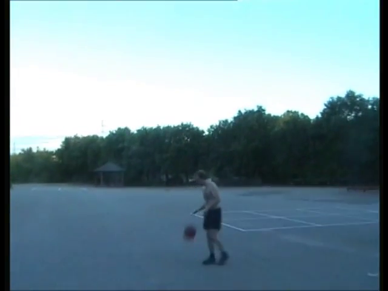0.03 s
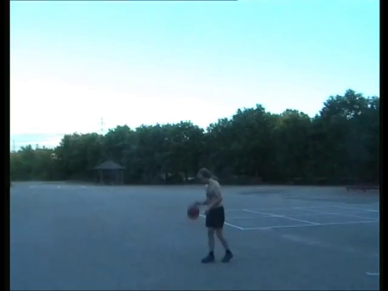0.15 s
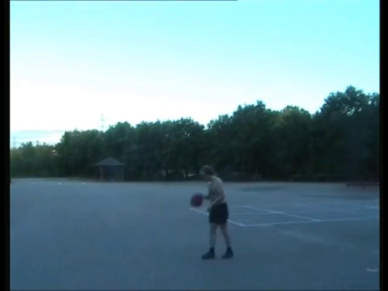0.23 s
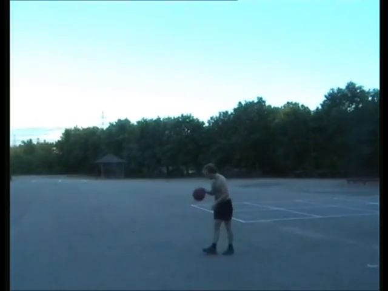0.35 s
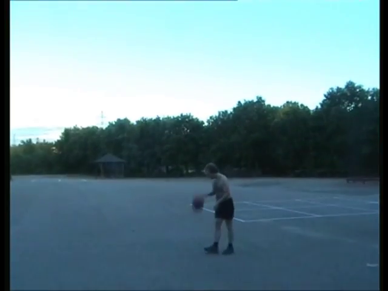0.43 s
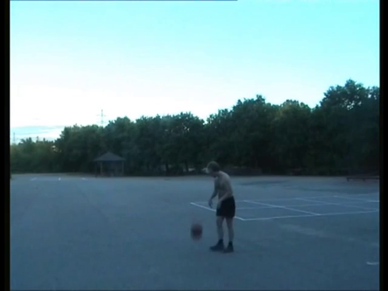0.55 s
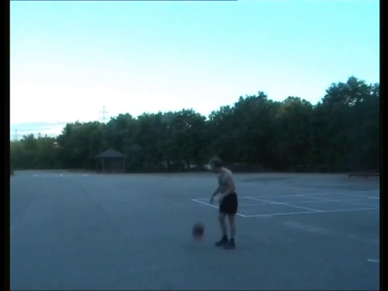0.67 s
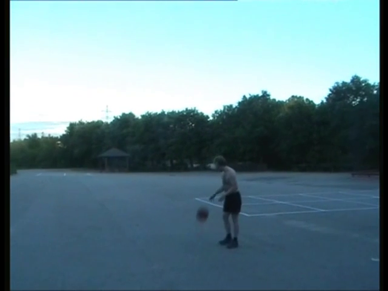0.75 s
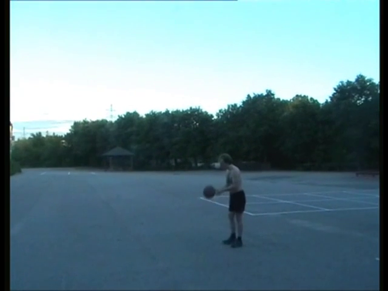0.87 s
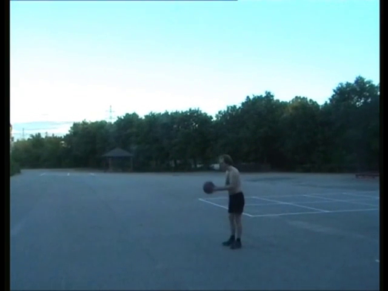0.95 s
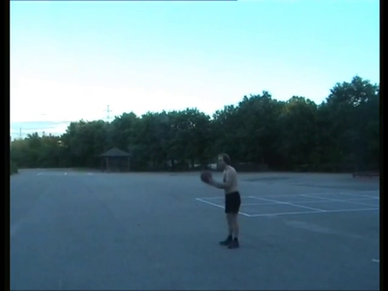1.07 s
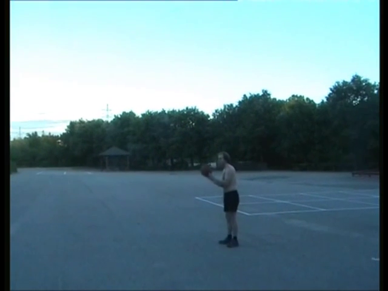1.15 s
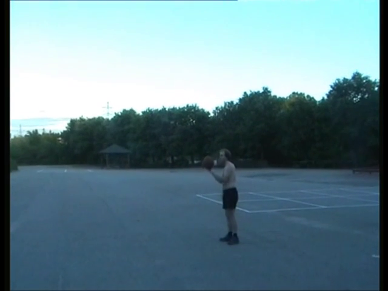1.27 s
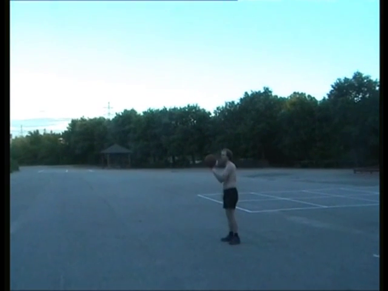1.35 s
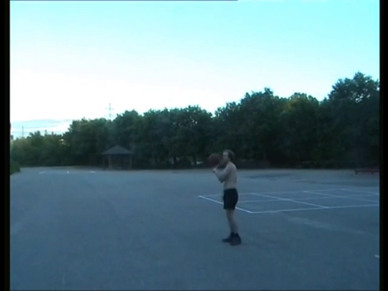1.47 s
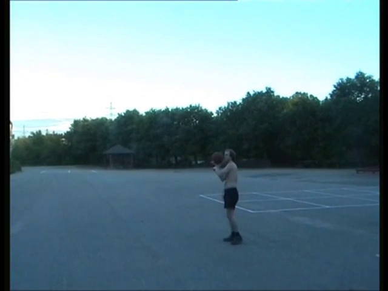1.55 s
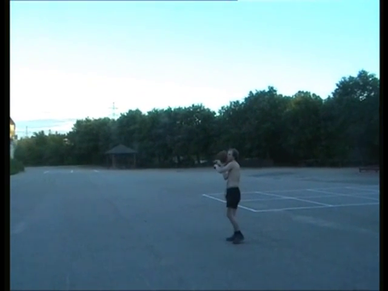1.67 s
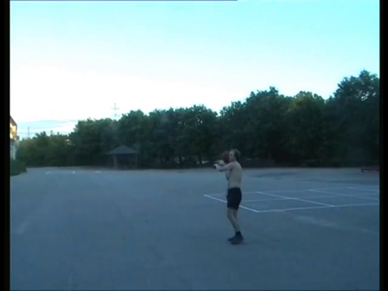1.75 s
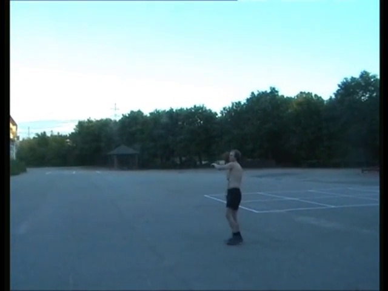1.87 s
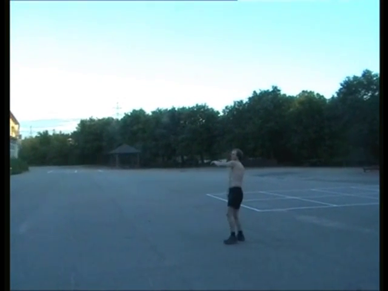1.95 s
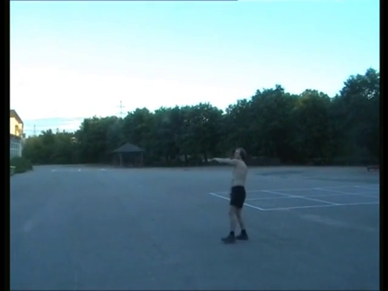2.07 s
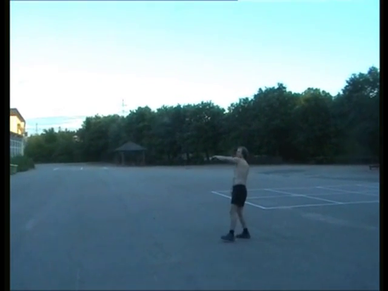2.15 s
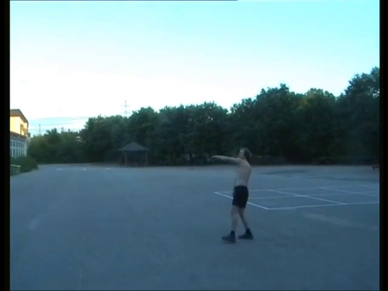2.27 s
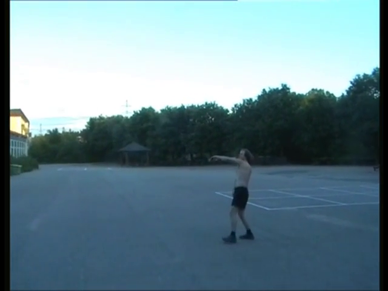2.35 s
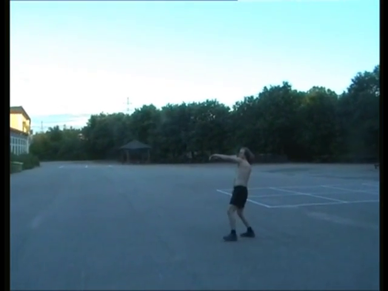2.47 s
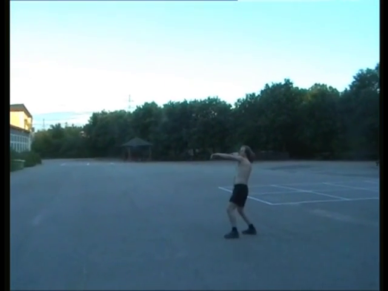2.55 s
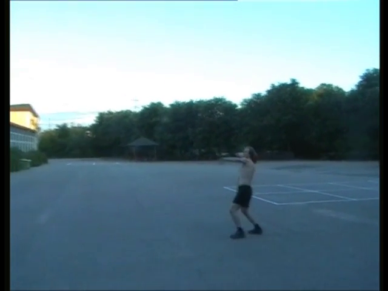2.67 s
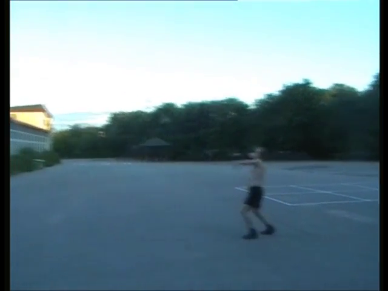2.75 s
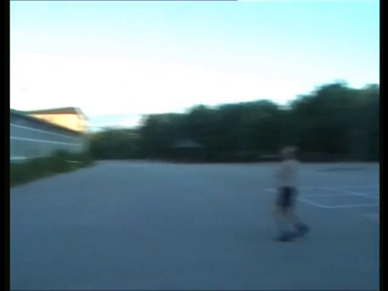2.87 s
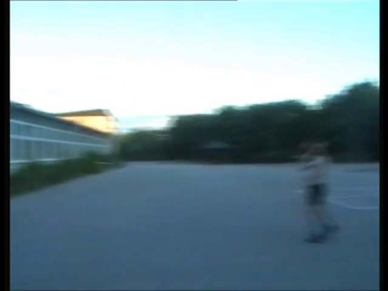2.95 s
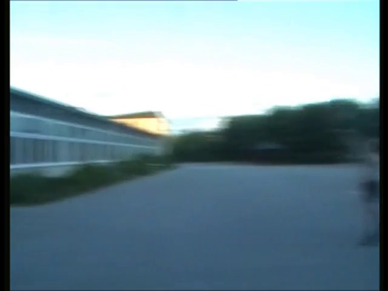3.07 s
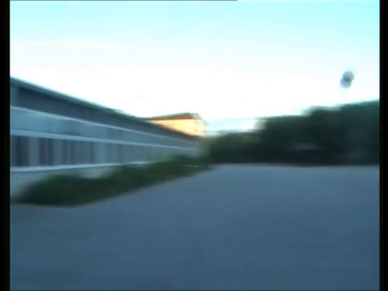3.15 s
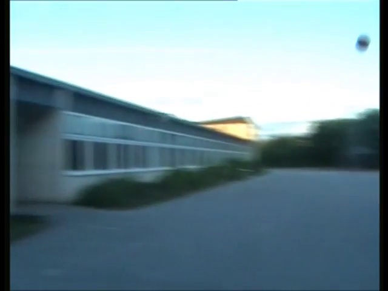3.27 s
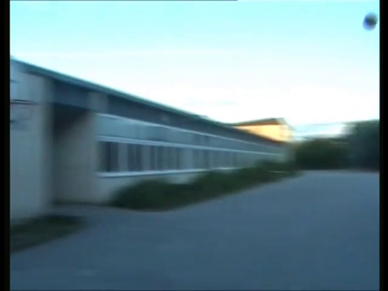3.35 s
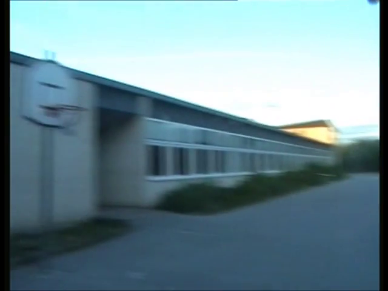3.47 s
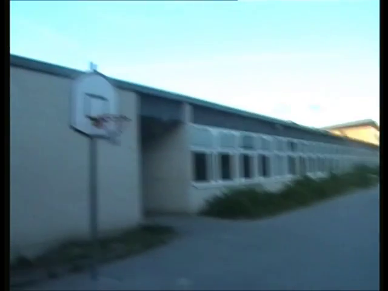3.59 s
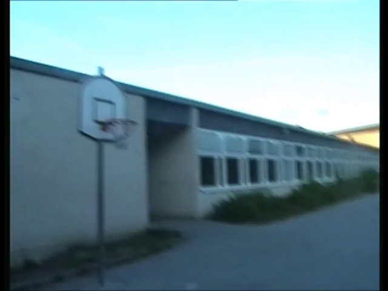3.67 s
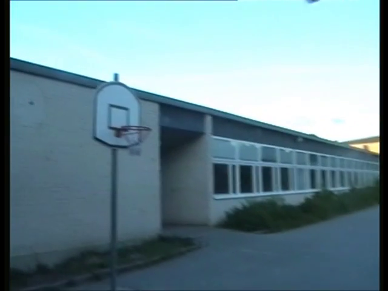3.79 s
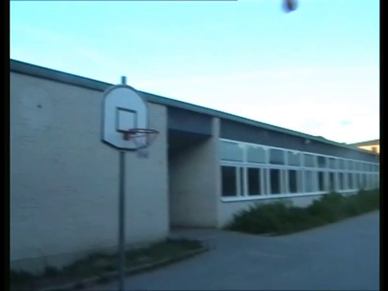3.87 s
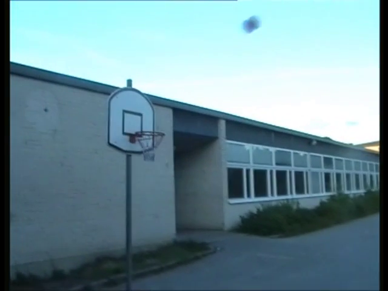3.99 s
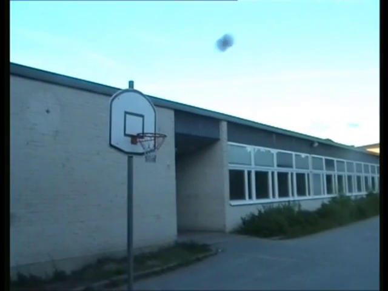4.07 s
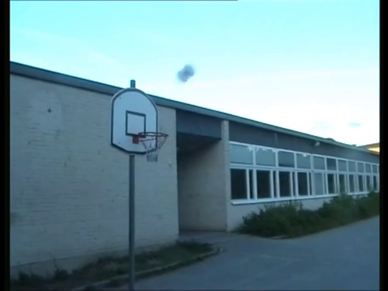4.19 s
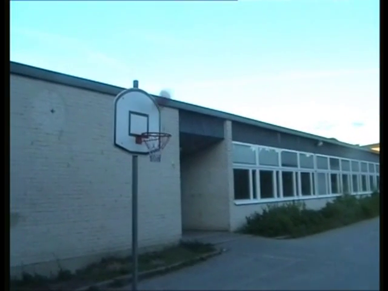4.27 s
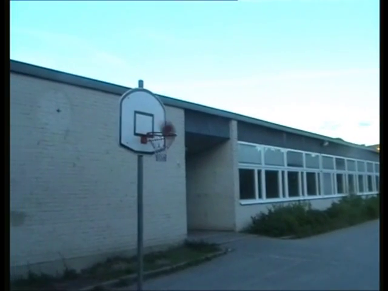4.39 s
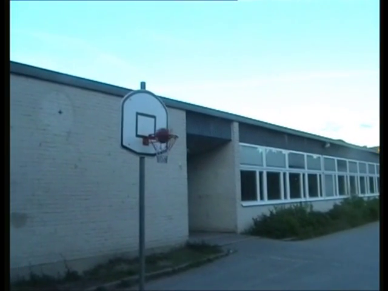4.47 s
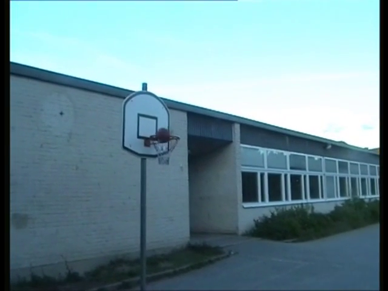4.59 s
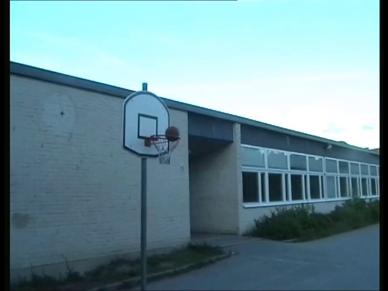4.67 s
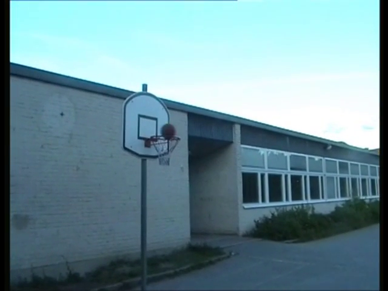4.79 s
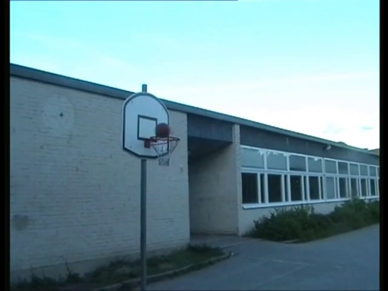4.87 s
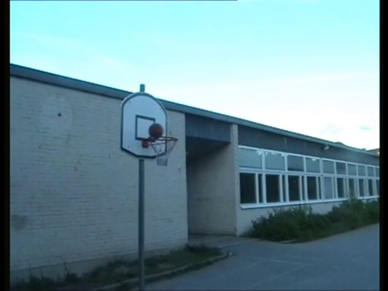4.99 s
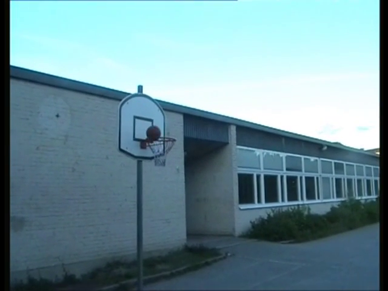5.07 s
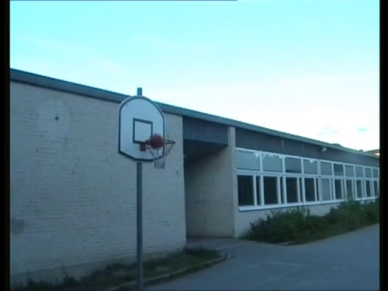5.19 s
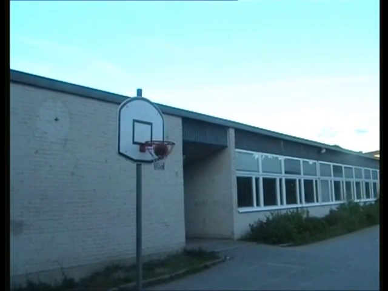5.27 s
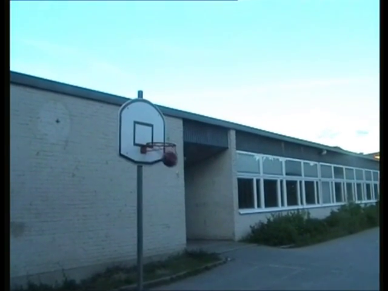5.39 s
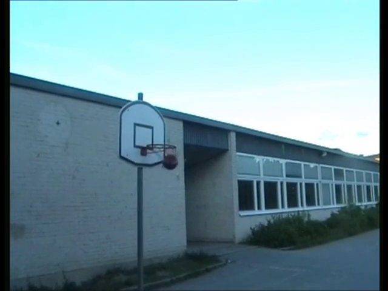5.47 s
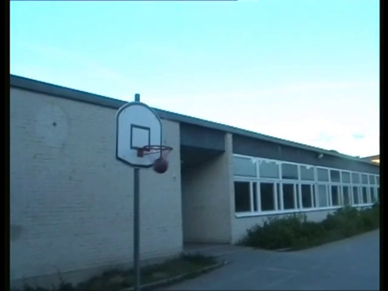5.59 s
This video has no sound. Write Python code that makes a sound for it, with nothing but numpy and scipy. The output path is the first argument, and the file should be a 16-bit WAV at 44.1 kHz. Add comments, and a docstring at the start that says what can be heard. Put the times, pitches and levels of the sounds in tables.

```python
"""An open schoolyard beside a wall, two close microphones: a basketball is dribbled once on asphalt and thrown.
Noise shaped by a spectrum makes the far traffic; strokes of fine grains make the rubbing clothes.
Grit snaps under the player's shoes as cracks and chatter; the ball is a rubber slap with damped modes.
It slams into the backboard and knocks about on the steel rim: rough blows drive board, rim and chain net.
A faint low tone sweeps up after the bounce; at the end a dry snap close by returns off the wall."""
import sys
import numpy as np
from scipy import signal
from scipy.fft import rfft, irfft
from scipy.io import wavfile

SR = 44100
rng = np.random.default_rng(int(sys.argv[2]) if len(sys.argv) > 2 else 0)


def digitize_waveform(pressure):
    """Quantize a signal to 16-bit integers and store it at the path in sys.argv[1].

    Rows of a 2-D input are taken as channels; values are limited to [-1, 1].
    """
    field = np.atleast_2d(pressure).T
    bounded = np.clip(field, -1, 1)
    quanta = np.round(bounded * 32767).astype(np.int16)
    wavfile.write(sys.argv[1], SR, quanta)


N = 248724
TIME = np.arange(N) / SR

# In all tables t60 is the time to fall by 60 dB; levels are dB ahead of any later gain.
# A "spectrum" has rows of: frequency in Hz, relative level in dB.

# Distant traffic over time. Each row: time in seconds, gain in dB.
TRAFFIC_GAIN = [(0, -21.4), (.65, -21.5), (1.0, -20), (2.8, -19), (3.7, -20), (5.64, -19.5)]
# Spectrum of the traffic's roar.
ROAR_SPECTRUM = [(15, -46), (25, -30.5), (43, -12), (61, -17), (75, -6.5), (152, -7), (205, -2.5),
                 (300, -7), (333, -4.5), (371, -6.5), (592, -5.5), (672, 0), (964, 1), (1350, -4),
                 (4000, -37.5), (5200, -74), (8800, -120)]
# Engine drones far off. Each row: frequency in Hz, width in Hz, level in dB relative to the traffic gain.
ENGINE_DRONES = [(124.2, 9, -23.5), (201.8, 47, -17), (264.2, 40, -20.5), (336.2, 31, -20),
                 (785, 87, -13.5), (1052, 154, -11.5)]
# One low engine hum that swells early on. Each row: time in seconds, level in dB.
LOW_HUM_LEVEL = [(.2, -41.5), (.8, -36), (1.8, -41.5)]
# Spectrum of the faint high hiss.
HISS_SPECTRUM = [(4000, -1.5), (5400, 4.5), (6300, -7.5), (7300, 2.5), (8400, -10.5), (9500, -2),
                 (10500, -26), (12000, -38.5)]

# Faint rubbing of clothes and handling, close by. Each row: time in seconds, level in dB.
RUBBING_LEVEL = [(0, -43), (.3, -50), (2.6, -61.5), (2.85, -50.5), (4.2, -48.5), (5.64, -46)]
# Single swishes of fabric. Each row: peak time in seconds, level in dB, half-length in seconds.
FABRIC_SWISHES = [(2.76, -48.5, 0.037), (2.98, -45, 0.032), (3.14, -47.5, 0.041), (3.31, -45, 0.091),
                  (4.07, -48, 0.037)]
# Spectrum of the cloth.
CLOTH_SPECTRUM = [(800, -27.5), (2800, 16.5), (5000, -2), (7000, -2.5), (10000, -6.5), (11500, -14.5),
                  (13000, -43)]

# A faint rising tone. One row: start in seconds, length in seconds, from Hz, to Hz, level in dB.
RISING_TONE = (.73, .115, 60, 265, -26.5)

# Grit cracking under shoes. Each row: start in seconds, level in dB, t60 in seconds.
GRIT_CRACKS = [(.0605, -22.5, 0.05), (.0662, -21, 0.012), (.0702, -20, 0.0068), (.0779, -11.5, 0.0047),
               (.245, -34, 0.0073), (3.2565, -34, .015), (3.2895, -31, .015), (3.3305, -38, .02),
               (3.358, -34.5, .025)]
# Spectrum of the grit.
GRIT_SPECTRUM = [(200, -10), (1700, 6), (2900, 3.5), (3800, -2.5), (5200, -5), (6200, -16), (7200, -9),
                 (9000, -17), (11800, -16), (13000, -46)]
# Dry clicks close by, with a faint reflection and a strong return off the wall.
# Each row: start in seconds, level in dB.
DRY_CLICKS = [(5.5931, -3), (5.595, -2.5), (5.611, -22), (5.6255, -1)]
# Their short ring. Each row: frequency in Hz, level in dB, t60 in seconds.
CLICK_RING = [(2320, -2, 0.0087), (2810, -1.5, 0.0085), (4840, -5, 0.0043), (5570, -9.5, 0.0057),
              (7350, -9, 0.0024)]

# Ball on asphalt. Each row: start in seconds, level in dB.
GROUND_BOUNCES = [(0.5491, -0.5)]
# The ball's shell and the air inside it. Each row: frequency in Hz, level in dB, t60 in seconds.
BALL_MODES = [(112, -11.5, 0.11), (199, -10.5, 0.069), (267, -14, 0.056), (375, -22.5, 0.11),
              (847, -6.5, 0.043), (1120, -7, 0.072), (1587, 1.5, 0.018), (3170, -9, 0.012),
              (3890, -12.5, 0.013), (4400, -10, 0.0056), (5230, -21, 0.0089)]
# Spectrum of rubber slapping the stones.
SLAP_SPECTRUM = [(100, -4), (1300, 6), (1950, 4.5), (2800, -9.5), (4500, -7), (6200, -27), (11000, -34),
                 (13500, -53)]

# Single links whipping against the rim. Each row: start in seconds, level in dB, pitch in Hz.
LINK_CLINKS = [(4.278, -26, 5560), (4.3, -22, 3250), (4.3217, -19, 2290), (4.334, -24, 5430),
               (4.4225, -19.5, 4480), (4.424, -22, 9200), (4.468, -22, 4310), (4.5434, -24, 3100),
               (4.6305, -26, 3100), (4.661, -31, 5130), (4.7605, -25, 3830), (4.7625, -26.5, 6700)]
# A link's ring. Each row: ratio to its pitch, level in dB, t60 in seconds.
LINK_RING = [(1, 5.5, 0.025), (1.08, -4, 0.034), (1.37, -20, .02), (1.79, -5, .02)]
# Spectrum of the chain links.
CHAIN_SPECTRUM = [(2000, -6), (3500, 8), (4600, 0), (5500, 2), (6300, -1), (8000, -1), (9700, -2),
                  (10500, -4), (12000, -7.5), (14000, -51)]
# Thin high rim modes, stirred by the chain on its hooks. Each row: frequency in Hz, level in dB.
HOOK_RING = [(3795, 0), (4694, -2), (5512, -1), (5975, -3), (6653, -5), (7526, -5), (8660, -1)]
# Ball brushing the net as it drops through. Each row: peak in seconds, level in dB, half-length in seconds.
BALL_BRUSHES = [(5.03, -40.5, 0.011), (5.27, -45.5, 0.053)]

# The loose panel slapping its bracket. Each row: start in seconds, level in dB, pitch in Hz.
BRACKET_SLAPS = [(4.2425, -11, 800), (4.2465, -5, 284), (4.2565, -6, 996), (4.2725, -11, 760),
                 (4.2845, -12, 387), (4.292, -7.5, 275), (4.3, -19, 1010), (4.357, -5, 695),
                 (4.4125, -12, 1013), (4.462, -10, 1010), (4.4955, -14, 850), (4.689, -12, 665),
                 (4.7545, -1, 748)]
# A slap's hollow ring. Each row: ratio to its pitch, level in dB, t60 in seconds.
PANEL_RING = [(1, -0.5, 0.041), (1.52, -10.5, 0.051), (1.88, -10.5, .04)]
# Ball meeting the board. Each row: start in seconds, level in dB.
BOARD_HITS = [(4.2415, -3)]

# The slam, then the sprung rim's knocks. Each row: start in seconds, board level in dB, steel dB, chain dB.
HOOP_KNOCKS = [(4.2403, -5.5, -15.5, -49), (4.297, -16, -29, -32), (4.344, -12, -17.5, -39),
               (4.3565, -12.5, -18.5, -39), (4.4108, -6.5, -16.5, -22), (4.421, -10, -24.5, -36),
               (4.4658, -12.5, -26, -30), (4.538, -29.5, -33.5, -27), (4.616, -17, -34, -27.5),
               (4.687, -16.5, -30, -28), (4.7527, -15, -20.5, -24)]
# Spectrum of the whole board and pole flexing.
THUMP_SPECTRUM = [(90, -32), (165, 4.5), (240, -6.5), (350, 0.5), (500, -12.5), (900, -44)]
# Spectrum of the backboard panel.
BOARD_SPECTRUM = [(150, -11), (420, 6.5), (720, 9), (1150, 6), (1600, 2.5), (2400, -12), (5000, -17.5)]
# Its modes. Each row: frequency in Hz, level in dB.
BOARD_RING = [(506, -4), (600, -4), (680, 0), (759, 0), (964, -2), (1025, -2), (1155, -2), (1412, -4)]
# Spectrum of the steel rim and bracket.
STEEL_SPECTRUM = [(700, -32), (1400, 0.5), (1750, -1.5), (2150, -1.5), (2500, -1), (3350, 1), (3900, -21),
                  (5400, -17.5), (6500, -34), (12000, -39)]
# Their modes. Each row: frequency in Hz, level in dB.
STEEL_RING = [(1730, 1), (1860, -4), (1959, -1), (2287, -4), (2471, -2), (2748, 0), (2870, -1), (3116, -1),
              (3218, -2), (3248, -4), (3417, 0.5), (3490, -2), (3762, -6), (4339, -10)]
# The basket shuddering after the slam, part by part. Each has: delay in seconds, level in dB, t60 in seconds.
POLE_RATTLE = (0.0022, -11, 0.46)
BOARD_RATTLE = (0.015, -18.5, 0.38)
RIM_RATTLE = (0.043, -29.5, 0.49)
CHAIN_RATTLE = (0.041, -23, 1.4)

# Left capsule minus right. Each row: frequency in Hz, difference in dB.
CAPSULE_BALANCE = [(60, .5), (250, 1.5), (1000, 1.6), (2000, 2), (4000, 2.9), (12000, 3.2)]

# chatter after a 0 dB knock; each dB below that stretches its t60 by this many dB
KNOCK_T60_S, LINGER_DB_PER_DB = 0.025, 0.95
PRESS_S = 0.0055  # ball and rim stay pressed together before a knock dies away
THUMP_DB, THUMP_T60_S = -21.5, 0.29  # every knock flexes board and pole alike
JOLT_RE_STEEL_DB, JOLT_T60_S = -8, 0.061  # a knock jerks the top links at once
CHAIN_LAG_S, CLASH_T60_S = 0.011, 0.13  # the hanging links collide a moment later
SHUDDER_GAP_S, SHUDDER_TAP_T60_S = 0.014, 0.048  # a shudder is an uneven run of short taps
WALL_DELAY_S = 0.0333


def amp(db):
    """Decibels to gain."""
    return 10 ** (np.asarray(db) / 20)


def unit_energy(response):
    """Scale a response so that white noise keeps its level through it."""
    return response / np.sqrt(np.sum(response ** 2, axis=-1, keepdims=True))


def through(x, response):
    """Pass a sound through an impulse response."""
    return signal.fftconvolve(x, response, axes=-1)[..., :N]


def level(rows):
    """Gain over time, interpolated in dB between rows of (s, dB)."""
    return amp(np.interp(TIME, *np.transpose(rows)))


def swells(rows):
    """Gain over time of soft strokes (s, dB, half-length) that rise and fall like a bell."""
    power = sum((amp(db) * np.exp(-.5 * ((TIME - s) / half) ** 2)) ** 2 for s, db, half in rows)
    return np.sqrt(power)


def fade(start, t60):
    """An envelope that jumps to one and dies away, to -120 dB at the lowest."""
    age = TIME - start
    return (age >= 0) * amp(-60 * np.clip(age / t60, 0, 2))


def dull(x, cut_hz, order=2):
    """Low-pass."""
    return signal.sosfilt(signal.butter(order, min(cut_hz, SR / 2 - 1), fs=SR, output="sos"), x)


def colour(points, size=8192):
    """Causal (minimum-phase) impulse response with the given (Hz, dB) spectrum."""
    hz, db = np.transpose(points)
    log_hz = np.log(np.fft.rfftfreq(size, 1 / SR) + 1)
    beyond = np.abs(log_hz - np.clip(log_hz, np.log(hz[0]), np.log(hz[-1])))
    # outside the listed range the gain falls by 12 dB per octave
    log_gain = np.log(amp(np.interp(log_hz, np.log(hz), db))) - 2 * beyond
    # folding the cepstrum onto positive times gives minimum phase
    cepstrum = irfft(log_gain)[:size // 2]
    cepstrum[1:] *= 2
    return unit_energy(irfft(np.exp(rfft(cepstrum, size))))


def body(spectrum, modes, t60, ring_db):
    """Response of a struck part: a broad crack together with its ringing modes."""
    t = TIME[:SR]
    ring = sum((-1) ** k * amp(db) * np.sin(2 * np.pi * hz * t) for k, (hz, db) in enumerate(modes))
    ring = unit_energy(ring * fade(0, t60)[:SR])
    return unit_energy(colour(spectrum, size=SR) + amp(ring_db) * ring)


def grains(per_s, spread_db):
    """Tiny random contacts of uneven strength; rms 1."""
    sizes = amp(spread_db * np.clip(rng.standard_normal(N), -2, 2)) * rng.choice([-1, 1], N)
    clicks = sizes * (rng.random(N) < per_s / SR)
    return clicks / np.std(clicks)


def taps(blows):
    """Force of clean blows (s, dB): one sharp pulse each."""
    pulses = np.zeros(N)
    for s, db in blows:
        pulses[round(s * SR)] += amp(db)
    return pulses


def struck(blows, modes):
    """Clean blows of (s, dB) set damped modes of (Hz, dB, t60) ringing."""
    t = TIME[:SR // 2]
    ring = sum((-1) ** k * amp(db - 60 * t / t60) * np.sin(2 * np.pi * hz * t)
               for k, (hz, db, t60) in enumerate(modes))
    return through(taps(blows), ring)


def pitched(blows, modes):
    """Clean blows of (s, dB, Hz), each ringing modes of (ratio, dB, t60) at a pitch of its own."""
    return sum(struck([(s, db)], [(hz * ratio, mode_db, t60) for ratio, mode_db, t60 in modes])
               for s, db, hz in blows)


def spot(tint_db, spot_t60=0.012):
    """Each point of contact colours its blow with a brief ripple of its own."""
    t = TIME[:1024]
    ripple = unit_energy(rng.standard_normal(len(t)) * amp(-60 * t / spot_t60))
    return unit_energy(signal.unit_impulse(len(t)) + amp(tint_db) * ripple)


def contacts(rows, crack_db, per_s, spread_db, hold_s=0, tint_db=-5):
    """Force of rough blows (s, dB, t60): one clean crack, then a held and dying chatter of tiny contacts."""
    chatter = grains(per_s, spread_db)
    force = np.zeros(N)
    for s, db, t60 in rows:
        start = round(s * SR)
        span = slice(start, start + SR // 2)
        grain_run = chatter[span]
        dying_s = np.maximum(TIME[:len(grain_run)] - hold_s, 0)
        blow = grain_run * amp(-60 * dying_s / t60)
        blow[0] += amp(crack_db)
        force[span] += amp(db) * signal.fftconvolve(blow, spot(tint_db))[:len(blow)]
    return force


def shudder(delay, db, t60, count=28):
    """One part rattling after the first slam: a dying run of taps (s, dB, t60)."""
    early, uneven = rng.uniform(-1.5, 1, (count, 2)).T
    age = SHUDDER_GAP_S * np.abs(np.arange(count) + .3 * early)
    slam_s = HOOP_KNOCKS[0][0]
    return [(slam_s + delay + a, db + 2 * u - 60 * a / t60, SHUDDER_TAP_T60_S) for a, u in zip(age, uneven)]


def drone(hz, width_hz):
    """A narrow, wavering engine tone: noise through two resonances in a row; rms 1."""
    b, a = signal.iirpeak(hz, hz / width_hz, fs=SR)
    tone = signal.lfilter(b, a, signal.lfilter(b, a, rng.standard_normal(N)))
    return tone / np.std(tone)


def traffic(roar_db=-1.0):
    """Tyre roar from far away, with narrow engine drones wavering in it."""
    roar = amp(roar_db) * through(rng.standard_normal(N), colour(ROAR_SPECTRUM))
    engines = sum(amp(db) * drone(hz, width_hz) for hz, width_hz, db in ENGINE_DRONES)
    low_hum = level(LOW_HUM_LEVEL) * drone(hz=78.6, width_hz=7.1)
    return level(TRAFFIC_GAIN) * (roar + engines) + low_hum


def ambience(hiss_db=-59):
    """Traffic under a thin even hiss."""
    return traffic() + amp(hiss_db) * through(rng.standard_normal(N), colour(HISS_SPECTRUM))


def rustle():
    """Fabric rubs in fine grains, with a swish at each movement."""
    strength = np.hypot(level(RUBBING_LEVEL), swells(FABRIC_SWISHES))
    return strength * through(grains(per_s=4100, spread_db=5.5), colour(CLOTH_SPECTRUM))


def low_whoop():
    """A faint low tone sweeps upward shortly after the bounce."""
    start, length, from_hz, to_hz, db = RISING_TONE
    progress = np.clip((TIME - start) / length, 0, 1)
    phase = 2 * np.pi * np.cumsum(from_hz + (to_hz - from_hz) * progress) / SR
    arch = np.sqrt(4 * progress * (1 - progress))
    return amp(db) * arch * np.sin(phase)


def grit():
    """Stones crack under a sole, each with a short run of tiny fractures."""
    fractures = contacts(GRIT_CRACKS, crack_db=18.5, per_s=8000, spread_db=15.0)
    return through(fractures, colour(GRIT_SPECTRUM))


def dry_clicks(crunch_db=-17, crunch_t60=0.011):
    """Something small and hard snaps, and its returns sound alike: a short ring with a gritty edge."""
    edge = sum(amp(db + crunch_db) * fade(s, crunch_t60) for s, db in DRY_CLICKS)
    crunch = edge * rng.standard_normal(N)
    return struck(DRY_CLICKS, CLICK_RING) + through(crunch, colour(GRIT_SPECTRUM))


def dribble(slap_db=-5, slap_t60=0.009, squash_s=0.0031):
    """The rubber slaps the ground for as long as it flattens; shell and enclosed air ring briefly."""
    stones = grains(per_s=12000, spread_db=3)
    press = 0
    for s, db in GROUND_BOUNCES:
        release = s + squash_s
        held_then_fading = np.where(TIME < release, TIME >= s, fade(release, slap_t60))
        press = press + amp(db + slap_db) * held_then_fading
    return through(press * stones, colour(SLAP_SPECTRUM)) + struck(GROUND_BOUNCES, BALL_MODES)


def clinks():
    """Each link that hits the rim rings briefly at a pitch of its own."""
    return pitched(LINK_CLINKS, LINK_RING)


def chain_net():
    """Each knock jerks the chain, then the links clash in many small clicks; at last the ball slides through."""
    jolts = [(s, steel_db + JOLT_RE_STEEL_DB, JOLT_T60_S) for s, _, steel_db, _ in HOOP_KNOCKS]
    clashes = [(s + CHAIN_LAG_S, chain_db, CLASH_T60_S) for s, _, _, chain_db in HOOP_KNOCKS]
    blows = [*jolts, *clashes, *shudder(*CHAIN_RATTLE)]
    links = contacts(blows, crack_db=1, per_s=2600, spread_db=4, tint_db=-2)
    brushes = swells(BALL_BRUSHES) * grains(per_s=3000, spread_db=4.5)
    return through(links + brushes, body(CHAIN_SPECTRUM, HOOK_RING, t60=.55, ring_db=-13))


def panel():
    """The loose panel gives a hollow bonk whose pitch depends on where it meets the bracket."""
    return pitched(BRACKET_SLAPS, PANEL_RING)


def ball_on_hoop(soft_hz=1300):
    """The yielding board makes a softer contact than asphalt, so the ball rings duller."""
    return dull(struck(BOARD_HITS, BALL_MODES), soft_hz)


def hoop():
    """Each knock flexes the board and sets the loose fittings chattering against panel and rim."""
    s, board_db, steel_db, _ = np.transpose(HOOP_KNOCKS)
    t60 = KNOCK_T60_S * amp(-LINGER_DB_PER_DB * board_db)  # lighter knocks chatter longer
    pole_blows = [*[(start, THUMP_DB, THUMP_T60_S) for start in s], *shudder(*POLE_RATTLE)]
    board_blows = [*zip(s, board_db, t60), *shudder(*BOARD_RATTLE)]
    steel_blows = [*zip(s, steel_db, t60), *shudder(*RIM_RATTLE)]
    on_pole = contacts(pole_blows, crack_db=16.0, per_s=3600, spread_db=6.5)
    on_board = contacts(board_blows, crack_db=13, per_s=1200, spread_db=1.5, hold_s=PRESS_S)
    on_steel = contacts(steel_blows, crack_db=13.0, per_s=1600, spread_db=5, hold_s=PRESS_S)
    thump = through(on_pole, colour(THUMP_SPECTRUM))
    board = through(on_board, body(BOARD_SPECTRUM, BOARD_RING, t60=0.67, ring_db=-5.5))
    steel = through(on_steel, body(STEEL_SPECTRUM, STEEL_RING, t60=0.55, ring_db=-10.5))
    return amp(-6.0) * thump + amp(-1.0) * board + amp(4.5) * steel


def radiated(x, cut_hz=80):
    """A ball or a panel is too small to give off deep bass."""
    return signal.sosfilt(signal.butter(2, cut_hz, "high", fs=SR, output="sos"), x)


def wall_echo(x, echo_db, cut_hz):
    """Add the single slap-back from the building."""
    delayed = np.interp(TIME - WALL_DELAY_S, TIME, x, left=0)
    return x + amp(echo_db) * dull(delayed, cut_hz)


def yard(x, t60, wet_db, cut_hz):
    """Add the diffuse tail scattered by the building and the trees, building up over the wall's delay."""
    build_up = np.minimum(TIME[:SR] / WALL_DELAY_S, 1) ** 2
    scatter = rng.standard_normal(SR) * fade(0, t60)[:SR] * build_up
    return x + amp(wet_db) * dull(through(x, unit_energy(scatter)), cut_hz)


def sideways(x, side_db=-17, t60=0.03):
    """Early reflections off the ground and the wall reach the two capsules unequally."""
    return amp(side_db) * through(x, unit_energy(rng.standard_normal(SR) * fade(0, t60)[:SR]))


def microphones(x, side, width_db=-19.5):
    """Two close capsules hear nearly the same, the left louder towards the treble; scattered sound differs."""
    balance_db = np.interp(np.fft.rfftfreq(N, 1 / SR), *np.transpose(CAPSULE_BALANCE))
    pair = irfft(rfft(x) * amp(np.outer([.5, -.5], balance_db)), N)
    difference = amp(width_db) * ambience() + side
    return pair + np.outer([1, -1], difference)


def scene():
    """The player in the open yard, the hoop by the wall, traffic all around."""
    shoes = yard(wall_echo(grit(), echo_db=-12.0, cut_hz=6000), t60=0.2, wet_db=-10.5, cut_hz=19000)
    clicks = yard(dry_clicks(), t60=0.26, wet_db=-8.5, cut_hz=19000)
    bounce = wall_echo(radiated(dribble()), echo_db=-7.0, cut_hz=4400)
    ball = yard(bounce, t60=.33, wet_db=-17, cut_hz=9000)
    board_and_rim = radiated(ball_on_hoop() + hoop() + panel())
    basket = yard(board_and_rim + chain_net() + clinks(), t60=0.13, wet_db=-9.0, cut_hz=8500)
    play = ball + shoes + clicks + basket + rustle() + low_whoop()
    return microphones(play + ambience(), sideways(play))


def record(dry, ceiling=0.95, cutoff_hz=14000):
    """Rumble is removed, the loudest peaks are flattened and the top is cut."""
    lean = signal.sosfilt(signal.butter(4, 36, "high", fs=SR, output="sos"), dry)
    rounded = lean / (1 + (lean / ceiling) ** 4) ** (1 / 4)
    return signal.sosfilt(signal.ellip(8, .5, 80, cutoff_hz, fs=SR, output="sos"), rounded)


dry = scene()
out = record(dry)
digitize_waveform(out)
```